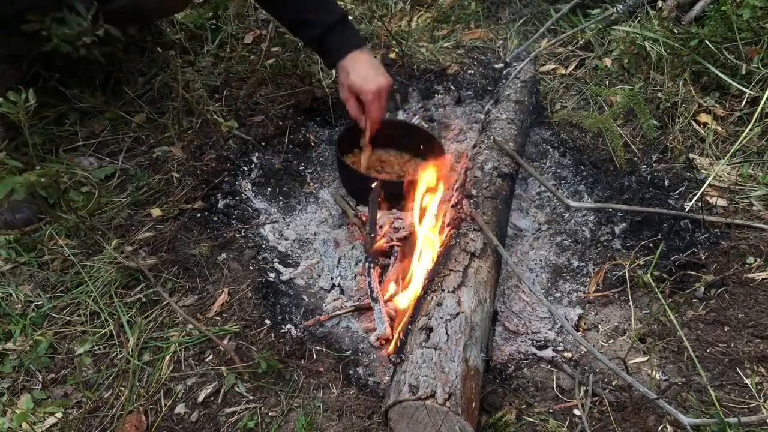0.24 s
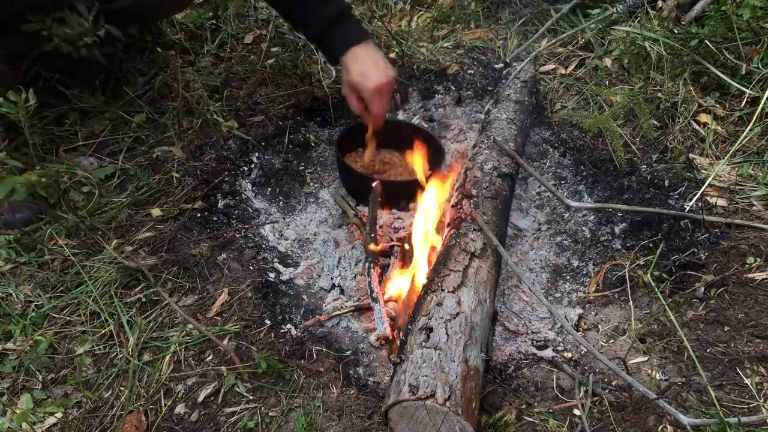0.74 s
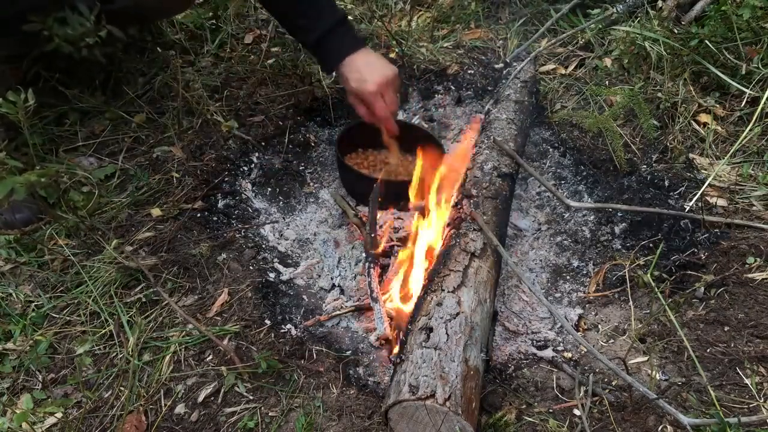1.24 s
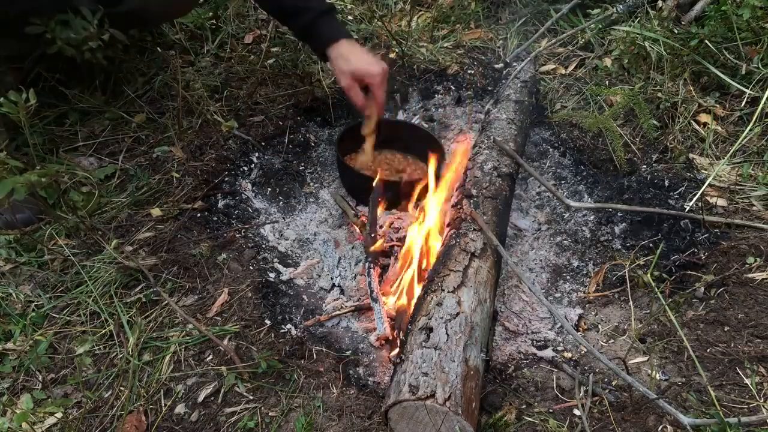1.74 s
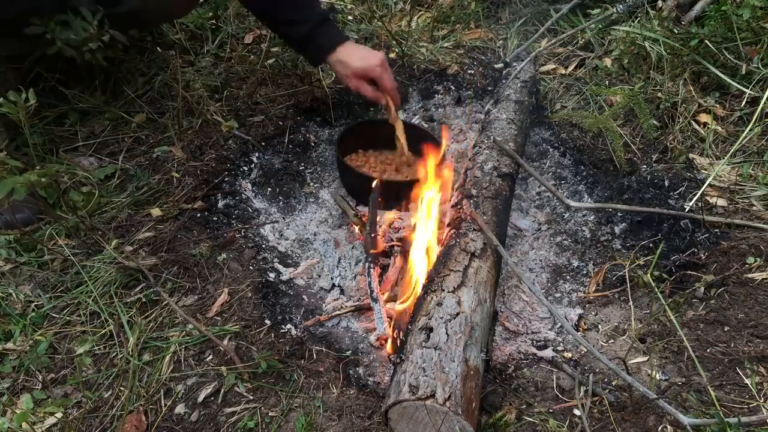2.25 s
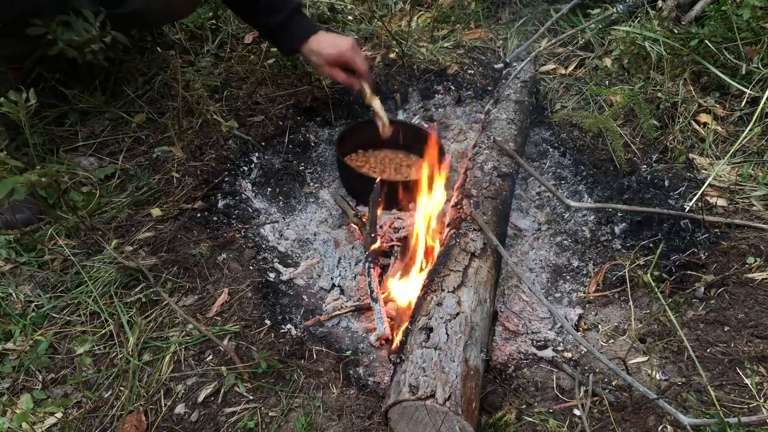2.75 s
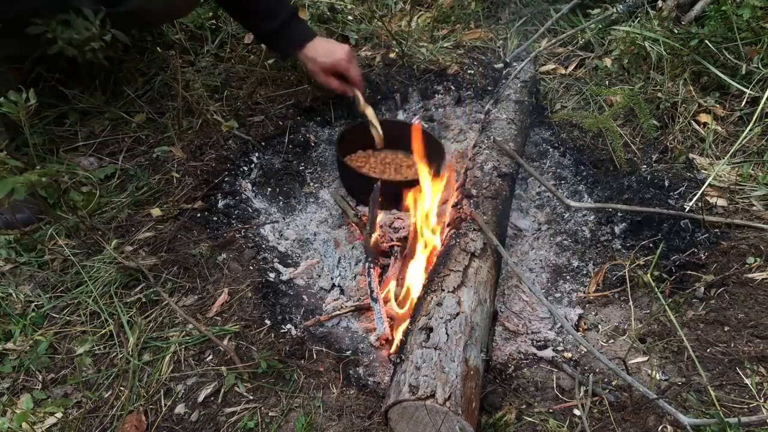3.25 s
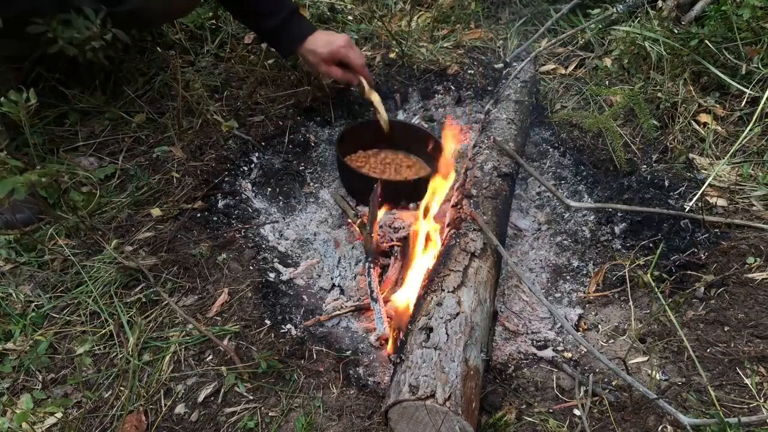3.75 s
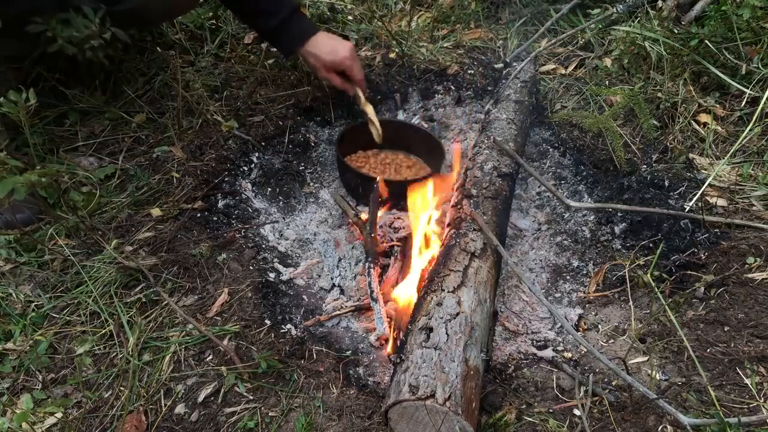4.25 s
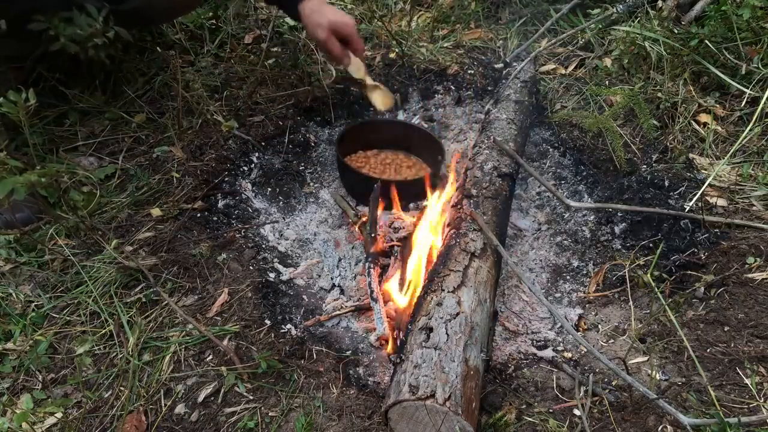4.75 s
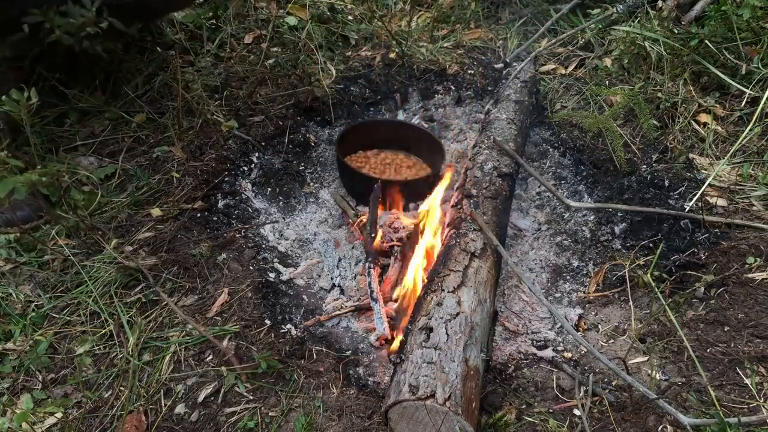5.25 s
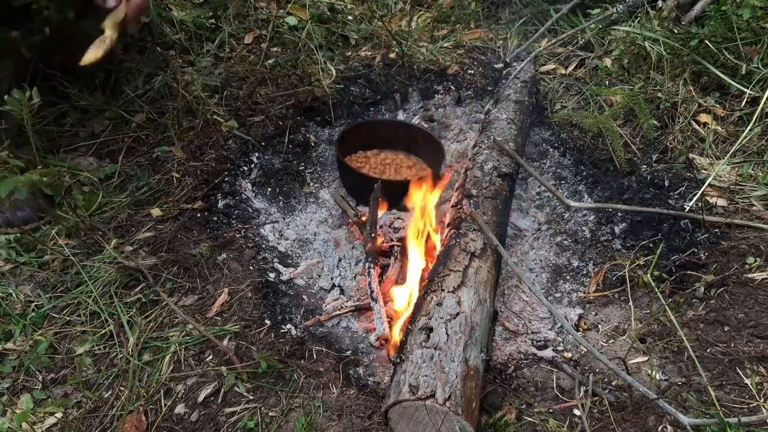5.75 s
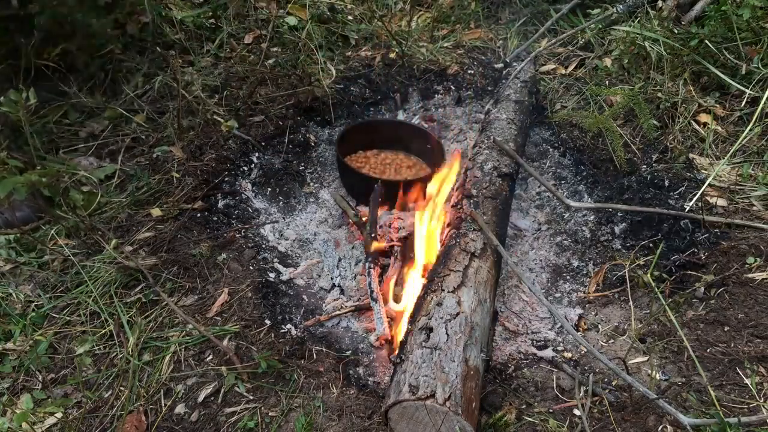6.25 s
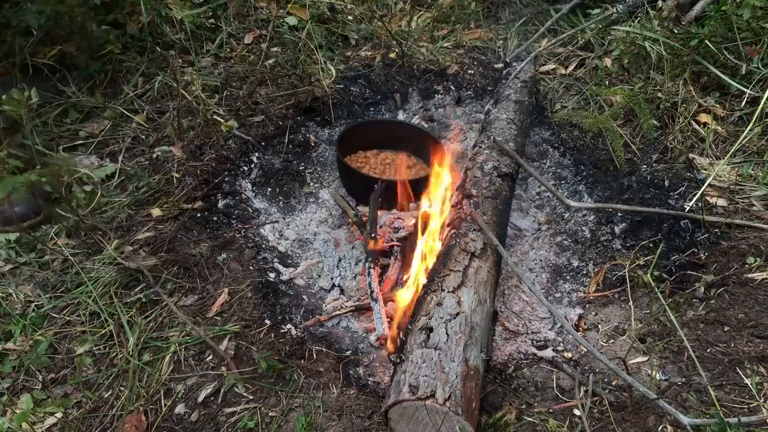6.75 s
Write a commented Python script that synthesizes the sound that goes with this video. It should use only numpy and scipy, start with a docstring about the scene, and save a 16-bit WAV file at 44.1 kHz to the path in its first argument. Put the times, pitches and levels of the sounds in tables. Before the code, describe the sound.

Outdoors among trees, a microphone close to a small wood fire. For the first two seconds it is quiet: low wavering hum of a far engine, soft air, sparse ember ticks, and faint fluttering squeaks of stirring at 0.75 and 1.2 s. A charcoal tick at 1.9 s leads to a loud double pop at 2.1 s, with more cracks at 2.6 and 2.8. From 2.9 to 4.6 s a wooden spoon knocks nine times on an iron pot's rim, about every 0.2 s: dry woody clacks, quick bounces, short metallic ring, more damped for the last two; the seventh is hardest and brightest. Fire pops fall between, notably at 3.6 and 4.45. Then pops with low thumps at 5.25 and 5.8, small flake ticks, and several cracks from 6.2. Sizzling steam starts near 5.2, swells at 6.4 and again towards 7, with brief wheezes. Loudest peaks clip; trees return a thin echo.

```python
"""A wooden spoon is knocked nine times on the rim of an iron pot: decaying modes of iron and wood, dry clacks, bounces.
Faint squeaks of stirring come first, as narrow fluttering bands.
The campfire pops, ticks and hisses with shaped pulses and noise, its loudest peaks clipped.
Behind it a far engine hums in low harmonics, trees return a faint noise-tail echo, and still air is soft noise."""
import sys
import numpy as np
from scipy import signal
from scipy.fft import rfft, irfft
from scipy.io import wavfile

SR = 44100
rng = np.random.default_rng(int(sys.argv[2]) if len(sys.argv) > 2 else 0)


def file_out(sig):
    """Save sig as 16-bit WAV at sys.argv[1]."""
    # one column per channel
    cols = np.atleast_2d(sig).T
    # limit, then scale
    lim = np.clip(cols, -1, 1)
    pcm = np.round(lim * 32767).astype(np.int16)
    wavfile.write(sys.argv[1], SR, pcm)


N = 308681
TIME = np.arange(N) / SR  # s
BINS = np.fft.rfftfreq(4096, 1 / SR)  # Hz, the grid on which short pulses are shaped

BOUNCE_SHRINK, BOUNCE_LOSS_DB = .85, 5.5  # each further bounce comes sooner and weaker
TOUCH_DB = -7  # each knock deadens what still rings from the knocks before

# Knocks on the rim: t/s, strength/dB, place on the rim/degrees, hardness/dB per octave,
# gap to first bounce/s, first bounce level/dB
KNOCKS = [(2.9059, 2, 5.2, 5.5, 0.0027, -4), (3.1036, .5, 12.5, 2.2, 0.0093, -3.5),
          (3.313, -1, 15.7, 1.5, .0085, -6.5), (3.5228, -1.4, 3.5, -2.5, 0.012, -8.5),
          (3.7243, 2, 37.9, -2, 0.014, -13.5), (3.916, 1, 37.2, 3, 0.013, -9.5),
          (4.1178, 3, 16.8, 10.5, 0.011, -1), (4.3463, 0.6, 13.6, 1.5, 0.013, -5.5),
          (4.5665, -3, 27.4, -0.5, 0.013, -5)]
# The spoon lies on the rim and damps the ring: t/s, level/dB so far
SPOON_DAMPING = [(4.170, 0), (4.190, -15), (4.66, -15), (4.86, -24)]


def pot(count=4):
    """Each knock sets the iron ringing while the spoon bounces, ever faster and softer."""
    out = np.zeros(N)
    damping_db = np.interp(TIME, *np.transpose(SPOON_DAMPING))
    for s, *_ in KNOCKS:
        damping_db = damping_db + TOUCH_DB * (TIME >= s - 1 / SR)
    for s, db, degrees, hardness, gap, bounce_db in KNOCKS:
        iron = amp(db - 1.0) * ring(wall(degrees))
        lost_db = damping_db[round(s * SR):][:len(iron)]
        damped_iron = iron * amp(lost_db - lost_db[0])
        touch = contact(spoon_db=-2.5, clack_db=-2.5, hardness=hardness)
        # the touch varies less with strength than the iron does
        add(out, s, damped_iron + amp(0.25 * db) * touch)
        delays = np.cumsum(gap * BOUNCE_SHRINK ** np.arange(count))
        for k, delay in enumerate(delays):
            bounce = contact(spoon_db=-4, clack_db=-1.5, hardness=-1.2)
            add(out, s + delay, amp(bounce_db - k * BOUNCE_LOSS_DB) * bounce)
    return out


NODE_DB = -28.5  # what is left of a mode struck on its node

# Bending modes of the pot's wall, with 2, 3, 4... waves round the rim: f/Hz
WALL_HZ = [193, 561, 1091.5, 1744, 2487.5, 3269, 4031, 4736, 5394, 6014, 7300]
# Each mode is a close pair that beats:
# level/dB, node on the rim/degrees, t60/s, split f/Hz, twin's relative level/dB
WALL_PAIRS = [(-34, 16.6, .22, 1, -19.5), (-39, 12, 0.41, 1, -20.5), (-33.5, 18, 0.54, 1, -14.5),
              (-24.5, 30.4, .47, 9.5, -7.5), (-23.5, 22.3, 0.27, 2, -19), (-13, 8.6, 0.28, 5.6, -11),
              (-10, 20, 0.23, 2.4, -16.5), (-24, 0.78, .19, 13, -2.5), (-21.5, 9.8, .11, 3, -20.5),
              (-30, 8.2, .12, 3, -20), (-36.5, 5.4, .043, 3, -20.5)]


def wall(degrees):
    """The wall's mode pairs for one spot on the rim: a mode struck near one of its nodes hardly rings."""
    modes = []
    for waves, (hz, pair) in enumerate(zip(WALL_HZ, WALL_PAIRS), 2):
        db, node, t60, split, twin_db = pair
        drive = np.sin(waves * np.radians(degrees - node)) ** 2 + amp(NODE_DB) ** 2
        level = db + 10 * np.log10(drive)
        modes += [(hz, level, t60), (hz + split, level + twin_db, t60)]
    return modes


HARD_HZ = 3500  # a hard hit tilts the clack upwards above this

# Modes of the spoon and the damped pot floor: f/Hz, level/dB, t60/s
SPOON_MODES = [(669.6, -35, 0.12), (1187, -41.5, .035), (1620, -21, 0.049), (1910, -17, .045),
               (2207, -3.5, 0.044), (2130, -12.5, .04), (2730, -36, .045), (2906, -15, 0.079),
               (3331, -11, 0.075), (3586, -11, 0.043), (3760, -21.5, 0.047), (7180, -36, 0.028)]
# Dry clack of wood on iron: f/Hz, level/dB
CLACK_COLOUR = [(40, -16.5), (200, 7.5), (600, 11.5), (1500, 20), (3500, 19.5), (4900, 6.5), (7000, 4),
                (10000, 1), (15000, -14)]


def contact(spoon_db, clack_db, hardness):
    """One touch of spoon on rim: a clack, brighter when hard, and the short ring of the wood."""
    octaves = np.log2(np.maximum(BINS / HARD_HZ, 1))
    colour = read(CLACK_COLOUR, BINS) + hardness * octaves
    pulse = recoil(click(colour), hz=2290, width_hz=1100)
    clack = scatter(pulse, db=1.5, t60=0.022, delay=.0008)
    # every touch detunes the modes slightly
    modes = [(hz * (1 + .004 * rng.standard_normal()), db, t60) for hz, db, t60 in SPOON_MODES]
    sound = amp(spoon_db) * ring(modes, spread=2.2)
    add(sound, 0, amp(clack_db) * clack)
    return sound


RISE_SHARE = 0.13  # each pulse of a squeak climbs by this share of its pitch

# Faint squeaks and wheezes: t/s, length/s, f/Hz, width/Hz, level/dB, flutter/per s, noisy share/0-1
SQUEAKS = [(0.751, 0.23, 1030, 90, -66.5, 28, 0.45), (1.192, 0.35, 978, 120, -71, 21, 0.5),
           (6.291, 0.14, 1175, 250, -61, 28, 1), (6.456, 0.028, 1366, 522, -52, 30, 1),
           (6.791, 0.053, 3490, 1536, -56, 28, 1)]


def squeaks():
    """Narrow fluttering bands: faint squeaks while stirring, later wheezes from the fire."""
    out = np.zeros(N)
    for s, length, hz, width_hz, db, flutter, noisy in SQUEAKS:
        t = TIME[:round(length * SR)]
        pitch = hz * (1 + RISE_SHARE * (flutter * t % 1 - .5))
        turns = np.cumsum(pitch) / SR
        roughness = 1 - noisy + noisy * drift(width_hz)[:len(t)]
        tone = unit(roughness * np.sin(2 * np.pi * turns))
        pulses = 2 * np.sin(np.pi * flutter * t) ** 2
        swell = np.sin(np.pi * t / length)
        add(out, s, amp(db) * tone * pulses * swell)
    return out


# A smaller pocket cracks higher and breaks a smaller splinter: its pitch over the crack's corner
SPLINTER_RATIO = 2.75

# Gas pockets bursting in the firewood; the second row is the first burst returning off the ground a moment
# later: # t/s, crack level/dB, crack corner f/Hz, splinter level/dB, gas puff level/dB
POPS = [(2.1309, 22, 2100, 8, 9), (2.1325, 11.5, 2200, 11, 9), (2.381, -12.5, 2430, -15.5, -18),
        (2.5747, 10, 2450, 10, 3), (2.7976, 14, 3270, -5.5, 14.5), (3.229, -2, 2650, -21, -27),
        (3.6356, 12.5, 2920, -1.5, -15.5), (4.087, -3.5, 2240, -23, -39.5), (4.3692, -3, 3700, 5, -14.5),
        (4.4498, 16.5, 2400, 7.5, 10), (5.2403, 8, 4300, -4.5, 1), (5.2453, 6.5, 4500, 9, 15),
        (5.26, -8, 1000, -35, 12), (5.287, -17, 1600, -35, 5), (5.7894, 19.5, 2010, 10, 24.5),
        (5.7925, -3.5, 4060, 10.5, 26), (5.801, 11, 1400, -2, -5), (6.1896, 10, 3900, 14.5, 2),
        (6.2975, 11.5, 3700, 11.5, 4.5), (6.4854, 14.5, 4740, -5.5, -3.5), (6.6069, -14, 2434, -10, 5),
        (6.9592, 3, 4860, 9.5, 19)]


def pops():
    """A burst is a shock, a splinter and a low puff of gas; steam then escapes from the opened pocket."""
    out = np.zeros(N)
    low_cut = -10 * np.log10(1 + (115 / (BINS + 1)) ** 4)
    puff = click(10 * np.log10(resonance(hz=88, q=0.69) / (1 + (BINS / 520) ** 4)))
    puff = scatter_source = puff
    jet = hiss_noise()
    for s, crack_db, corner_hz, splinter_db, puff_db in POPS:
        high_cut = -10 * np.log10(1 + (BINS / corner_hz) ** 6)
        shock = recoil(click(crack_db + low_cut + high_cut), hz=1803, width_hz=2500)
        add(out, s, amp(-0.5) * scatter(shock, db=-10, t60=0.018, delay=0.001))
        snap_power = amp(-7 + 1.4 * min(splinter_db, 0))
        add(out, s, splinter(SPLINTER_RATIO * corner_hz, splinter_db, snap_power, overtone_db=-8))
        add(out, s, amp(puff_db) * scatter(puff, db=-9.5, t60=.06, delay=.006))
        escaping = jet[round(s * SR):][:SR // 2]
        add(out, s, escaping * amp(crack_db - 72.5 - 170 * TIME[:len(escaping)]))
    return out


# Flakes of charcoal ticking off the log: t/s, level/dB, f/Hz
FLAKES = [(1.9209, -9, 3720), (5.419, -18, 3530), (5.47, -10.5, 1800), (5.628, -20, 12600),
          (5.644, -21, 4000), (5.6727, -16.5, 6290), (5.737, -16, 12500), (6.8504, -20, 14700)]


def flakes():
    """Each flake breaks off as a small splinter with a weak snap and a strong overtone."""
    out = np.zeros(N)
    for s, db, hz in FLAKES:
        add(out, s, splinter(hz, db, snap_power=amp(-37.5), overtone_db=-1.5))
    return out


def splinter(hz, db, snap_power, overtone_db):
    """A breaking sliver of wood rings in two modes over a broad snap."""
    main = resonance(hz, q=2.4) ** 2
    overtone = amp(overtone_db) ** 2 * resonance(hz * 1.9, q=4.0) ** 2
    snap = snap_power * resonance(hz, q=0.38)
    pulse = click(db + 10 * np.log10(main + overtone + snap))
    return scatter(recoil(pulse, hz=6860, width_hz=1100), db=-8, t60=0.024, delay=.0005)


# An ember's tick: f/Hz, level/dB
TICK_COLOUR = [(300, -21), (2500, -5.5), (7000, 1), (10000, -7), (12500, 2), (16000, 4)]


def embers(per_s, db, size_db, rise_db_per_s=-0.7):
    """Tiny random ticks from the glowing wood, slowly getting softer."""
    size = np.minimum(rng.exponential(1, N), 3.5)
    ticks = rng.random(N) < per_s / SR
    sizes = amp(db + rise_db_per_s * TIME + size_db * size) * ticks
    tick = scatter(click(read(TICK_COLOUR, BINS)), db=-10.0, t60=.015, delay=.0004)
    return signal.oaconvolve(sizes, tick)[:N]


# Swells of steam leaving the wood: t/s, level/dB
STEAM_LEVEL = [(0, -85.5), (4.9, -78.5), (5.2, -63), (6.05, -64), (6.37, -51), (6.68, -63.5), (6.8, -57),
               (7, -52)]
# Sizzle of boiling sap: f/Hz, level/dB
SIZZLE_COLOUR = [(300, -17), (2500, -7.5), (4000, -3), (7000, -0.5), (12000, -7), (16000, 2)]


def steam(sizzle_per_s=170, sizzle_db=-3):
    """Steam leaves the wood as a fluttering hiss with sizzling sap, in late swells."""
    size = np.minimum(rng.exponential(1, N), 3.5)
    sizes = amp(5 * size) * (rng.random(N) < sizzle_per_s / SR)
    spit = scatter(click(read(SIZZLE_COLOUR, BINS)), db=-8.5, t60=0.0054, delay=0.000094)
    sizzle = unit(signal.oaconvolve(sizes, spit)[:N])
    flutter_db = 1.3 * drift(rate_hz=35) + 1.1 * drift(rate_hz=6)
    hiss = hiss_noise() * amp(flutter_db)
    level_db = np.interp(TIME, *np.transpose(STEAM_LEVEL)) - 1.0
    return (hiss + amp(sizzle_db) * sizzle) * amp(level_db)


# Colour of escaping steam: f/Hz, level/dB per Hz
HISS_COLOUR = [(100, -7.5), (500, 5), (1200, 5), (2300, 2.5), (4000, 0.5), (7000, -3.5), (10000, -4.5),
               (15500, -3)]


def hiss_noise():
    """Escaping steam is broadband noise, before any level is set."""
    return noise(HISS_COLOUR)


def flame(db=-71):
    """The low, unsteady flutter of the flame."""
    colour = [(12, -38.5), (30, -11), (55, 0), (75, -0.5), (110, -3.5),
              (250, -15.0), (600, -38.5), (2000, -84)]  # f/Hz, level/dB
    return noise(colour) * amp(db + 1.9 * drift(rate_hz=4))


# Colour of the trees' echo: f/Hz, level/dB
ECHO_COLOUR = [(60, -6.5), (250, 4), (600, -5), (1800, 1.5), (6000, 5.5), (16000, -7.5)]


def trees(x, db, t60):
    """A thin diffuse echo from the surrounding trunks, as a decaying noise tail."""
    build_up = 1 - np.exp(-TIME / 0.0084)
    tail = (noise(ECHO_COLOUR) * amp(-60 * TIME / t60) * build_up)[:SR]
    return amp(db) * signal.fftconvolve(x, tail / np.linalg.norm(tail))[:N]


HUM_HZ = 45.8  # fundamental of the engine, itself left silent

# Harmonics of the far engine, from the second up: level/dB at first, rise/dB per s
ENGINE_HARMONICS = [(-59, 0), (-64, 2), (-75.5, 0), (-82, 0), (-78.5, 1.5)]


def engine():
    """Low wavering harmonics of a far engine; the third and sixth slowly grow."""
    turns = np.cumsum(HUM_HZ * (1 + 0.004 * drift(rate_hz=1.5))) / SR
    hum = np.zeros(N)
    for k, (db, rise) in enumerate(ENGINE_HARMONICS, 2):
        level_db = db + rise * TIME + 0.59 * drift(rate_hz=2.7)
        hum += amp(level_db) * np.sin(2 * np.pi * k * turns)
    return hum


# Colour of the still air: f/Hz, level/dB per Hz
AIR_COLOUR = [(15, -67.5), (25, -36), (59, -14.5), (74, -6), (92, -1.5), (114, -6.5), (161, -6.5),
              (250, -11.5), (754, -19), (1100, -18.5), (16000, -32)]


def still_air(db=-61.5):
    """Steady, mostly low noise of the open air."""
    return amp(db) * noise(AIR_COLOUR)


def amp(db):
    """Turns dB into an amplitude factor."""
    return 10 ** (np.asarray(db) / 20)


def unit(x):
    """Scales to rms 1."""
    return x / np.sqrt(np.mean(x ** 2) + 1e-20)


def read(points, hz):
    """Reads a spectrum on a log-frequency axis."""
    f, db = np.transpose(points)
    return np.interp(np.log(hz + 1), np.log(f + 1), db)


def add(mix, s, sound):
    """Mixes a sound in at time s."""
    part = mix[max(round(s * SR), 0):][:len(sound)]
    part += sound[:len(part)]


def noise(points):
    """Noise of rms 1 with the given spectrum."""
    gain = amp(read(points, np.fft.rfftfreq(N, 1 / SR)))
    return unit(irfft(rfft(rng.standard_normal(N)) * gain, N))


def drift(rate_hz):
    """Random wander of rms 1, low-passed at rate_hz."""
    low_pass = 1 / (1 + (np.fft.rfftfreq(N, 1 / SR) / rate_hz) ** 4)
    return unit(irfft(rfft(rng.standard_normal(N)) * low_pass, N))


def click(db):
    """The sharpest causal (minimum-phase) pulse that has this spectrum over BINS."""
    log_gain = np.log(amp(np.r_[db, db[-2:0:-1]]))
    return np.fft.ifft(np.exp(np.conj(signal.hilbert(log_gain)))).real[:len(BINS)]


def scatter(pulse, db, t60, delay):
    """A pulse followed by a short spray of random copies of itself."""
    t = TIME[:len(BINS)]
    build_up = 1 - np.exp(-(t / delay) ** 2)
    spray = rng.standard_normal(len(t)) * amp(-60 * t / t60) * build_up
    return pulse + amp(db) * signal.fftconvolve(pulse, spray / np.linalg.norm(spray))[:len(pulse)]


def ring(modes, spread=0.):
    """Decaying sines; the point of contact varies their strengths by spread dB."""
    t = TIME[:SR * 3 // 4]
    sound = np.zeros(len(t))
    for hz, db, t60 in modes:
        level_db = db + spread * rng.standard_normal() - 60 * t / t60
        sound += amp(level_db) * np.sin(2 * np.pi * hz * t)
    return sound


def resonance(hz, q):
    """Power response of one resonance over BINS."""
    return 1 / (1 + (q * ((BINS + 1) / hz - hz / (BINS + 1))) ** 2)


def recoil(pulse, hz, width_hz):
    """The wood flexes back: an all-pass turns one spike into a push, a pull and a push."""
    r = np.exp(-np.pi * width_hz / SR)
    poles = [1, -2 * r * np.cos(2 * np.pi * hz / SR), r * r]
    return signal.lfilter(poles[::-1], poles, pulse)


def scene():
    """Pot and fire close by, with their echo, the engine and the still air behind."""
    knocks = pot()
    fire = pops() + flakes()
    near = knocks + squeaks() + fire + embers(per_s=18, db=-44, size_db=5.5) + steam() + flame()
    echo = trees(knocks, db=-35.0, t60=0.33) + trees(fire, db=-36, t60=.6)
    return (near + echo + engine() + still_air())[None]


EDGE_HZ = 16150  # upper band limit


def record(dry):
    """The loudest peaks overload the microphone and clip; then the band limit."""
    clipped = np.clip(dry, -1, 1)
    low_pass = signal.firwin(255, EDGE_HZ, window=("kaiser", 8), fs=SR)
    return signal.oaconvolve(clipped, low_pass[None], "same")


dry = scene()
out = record(dry)
file_out(out)
```